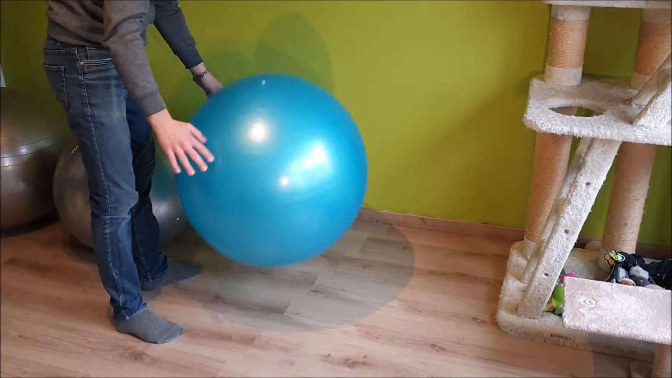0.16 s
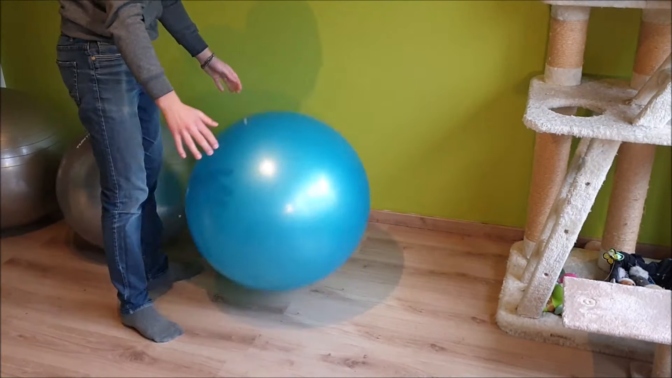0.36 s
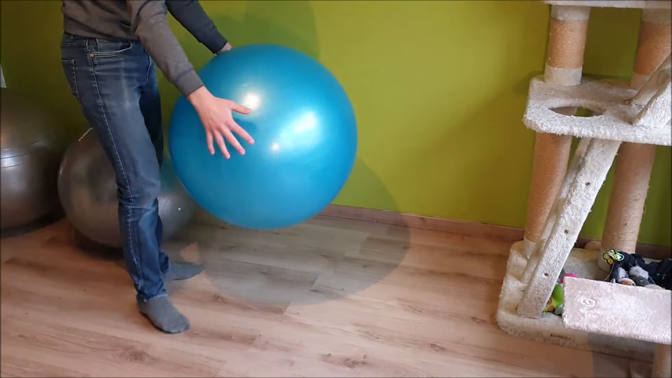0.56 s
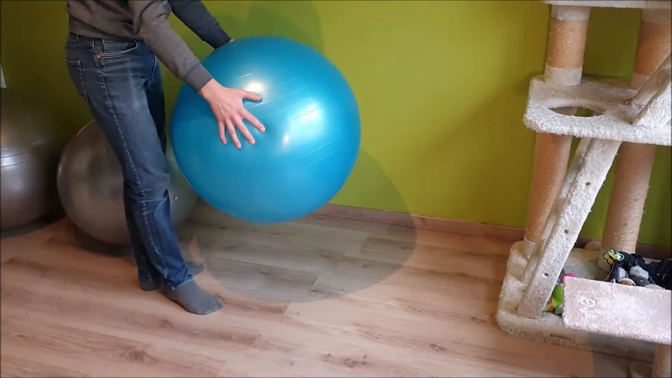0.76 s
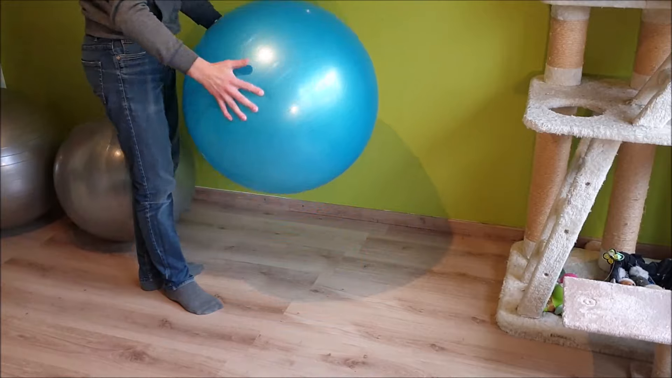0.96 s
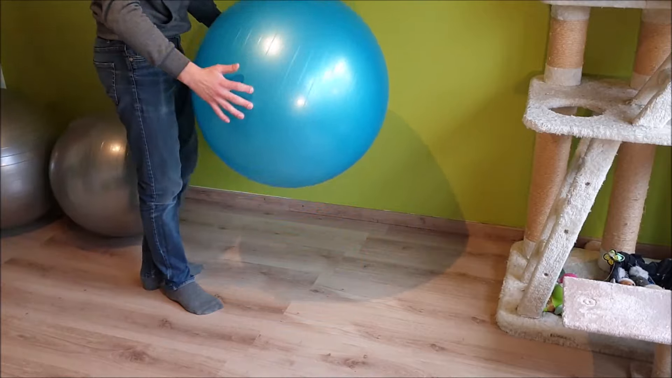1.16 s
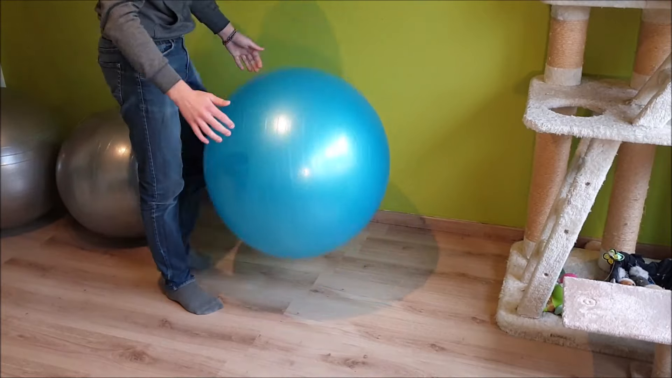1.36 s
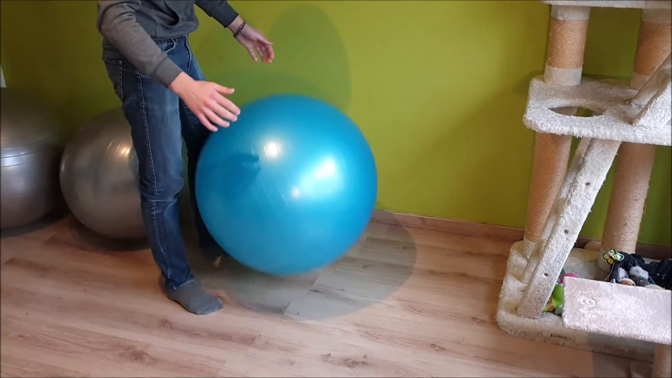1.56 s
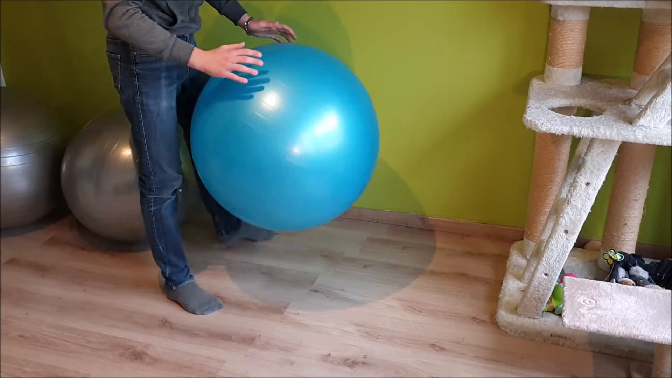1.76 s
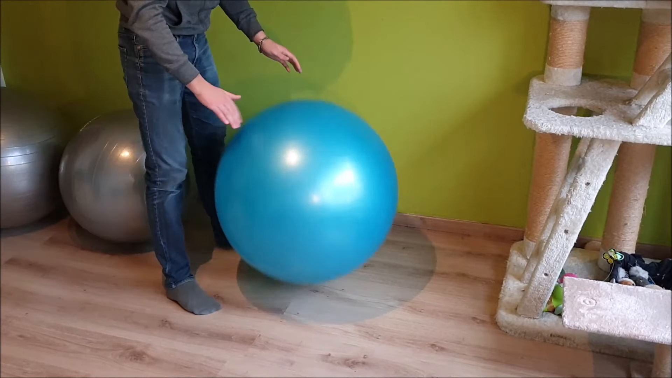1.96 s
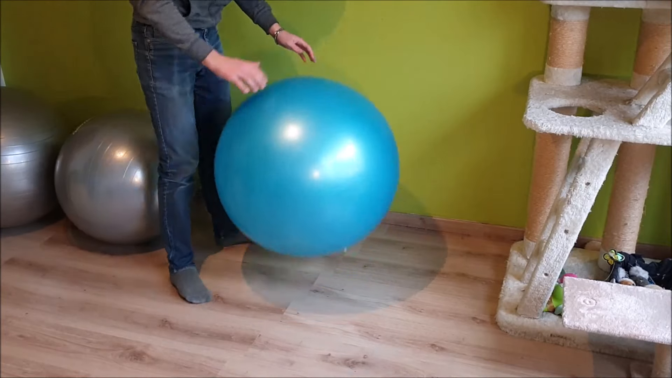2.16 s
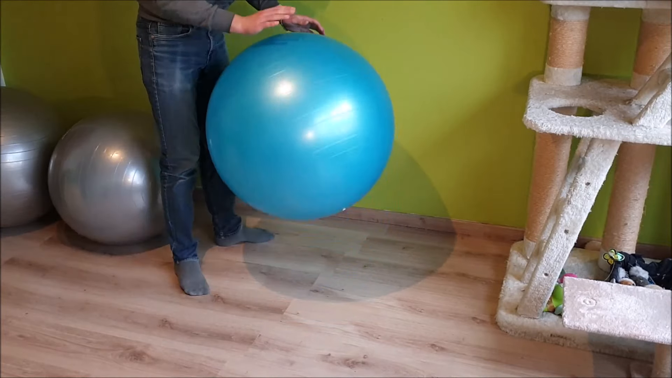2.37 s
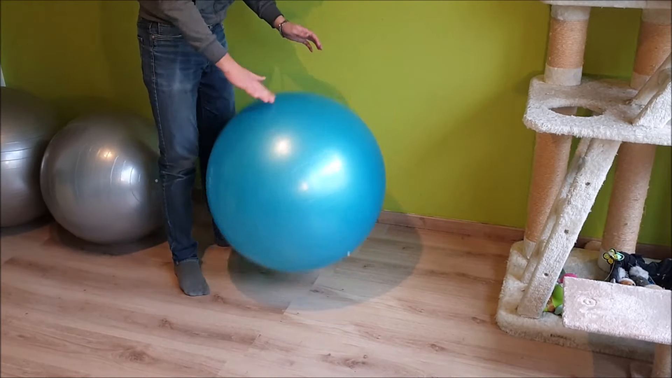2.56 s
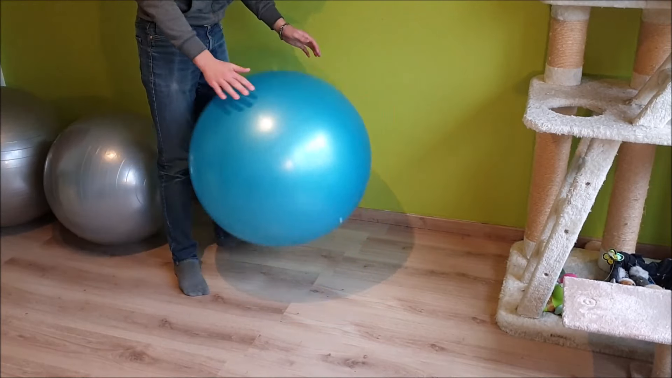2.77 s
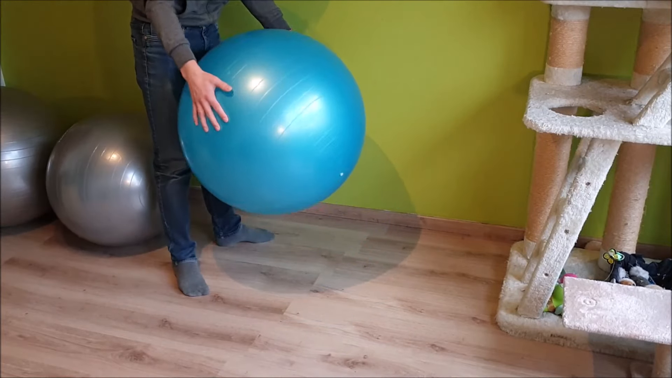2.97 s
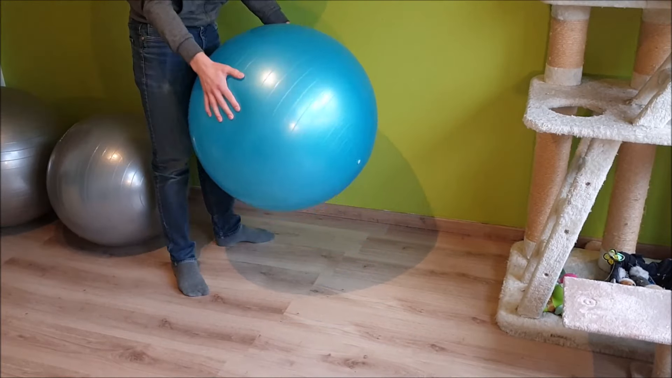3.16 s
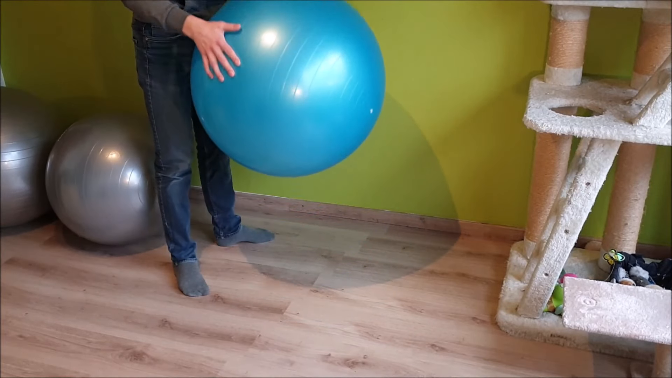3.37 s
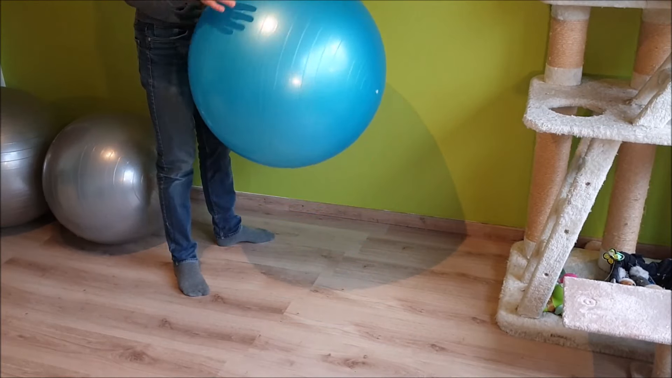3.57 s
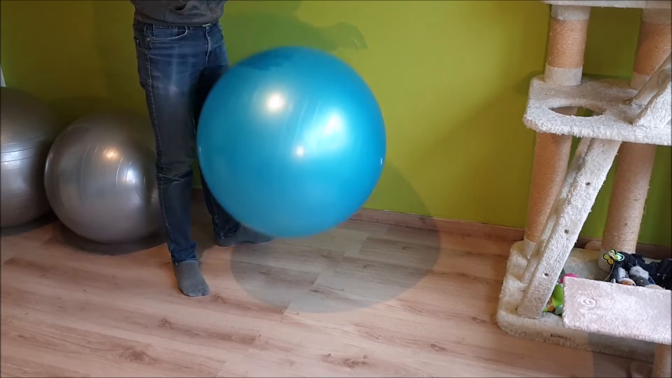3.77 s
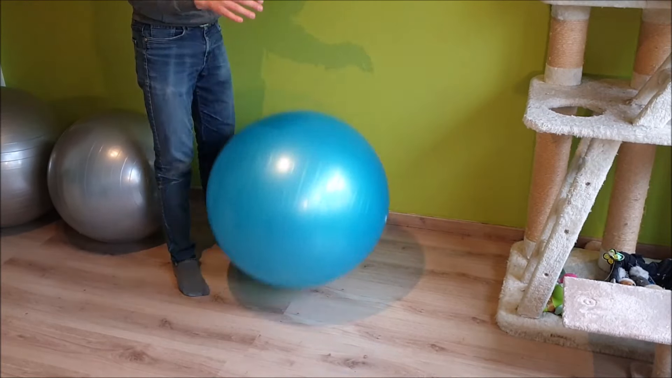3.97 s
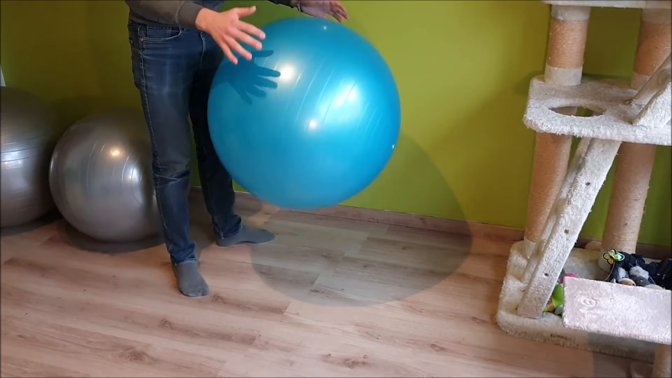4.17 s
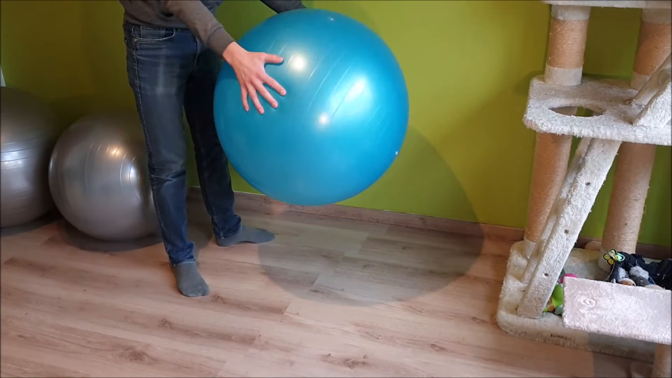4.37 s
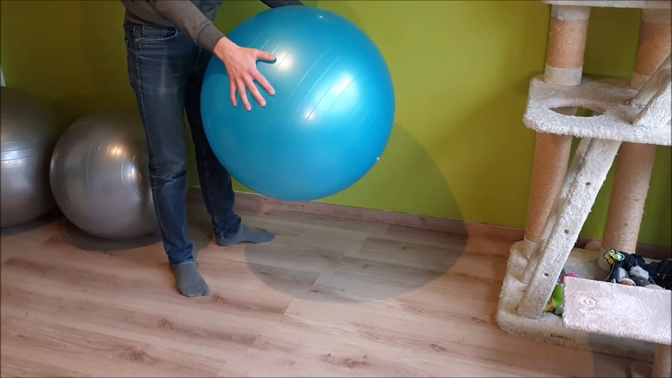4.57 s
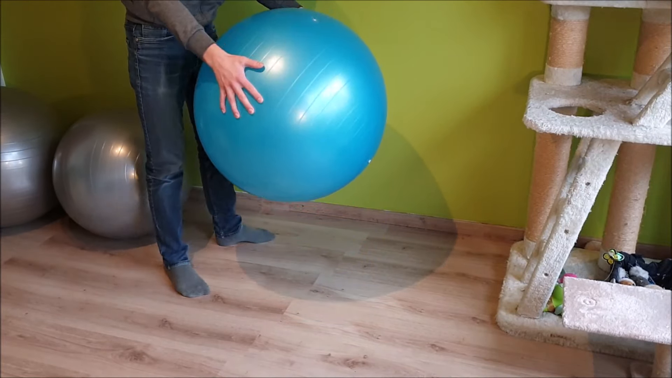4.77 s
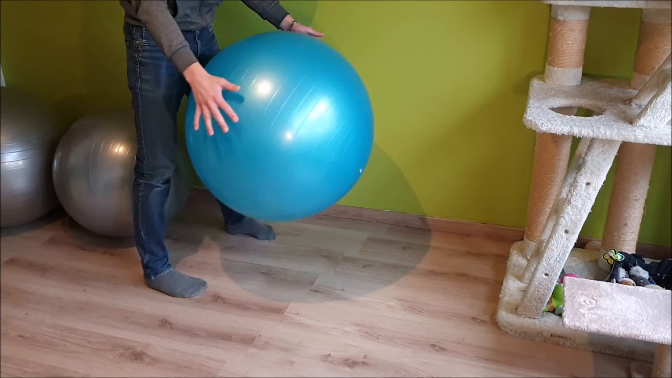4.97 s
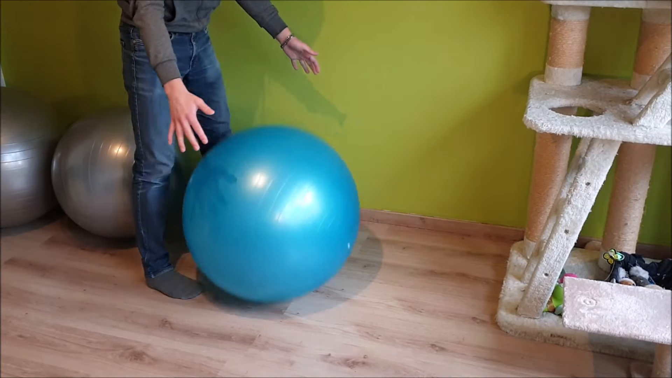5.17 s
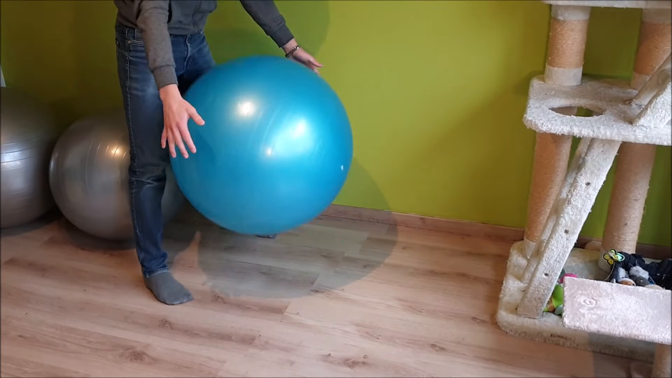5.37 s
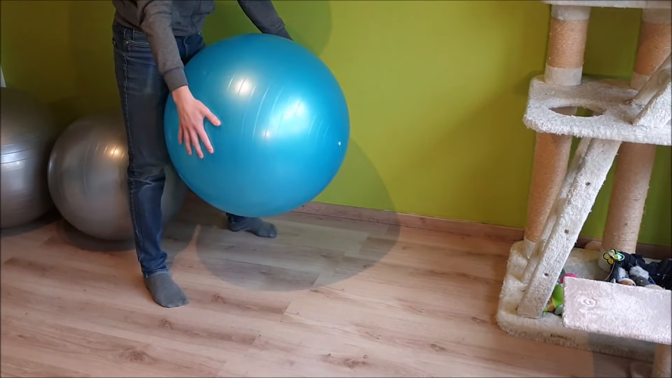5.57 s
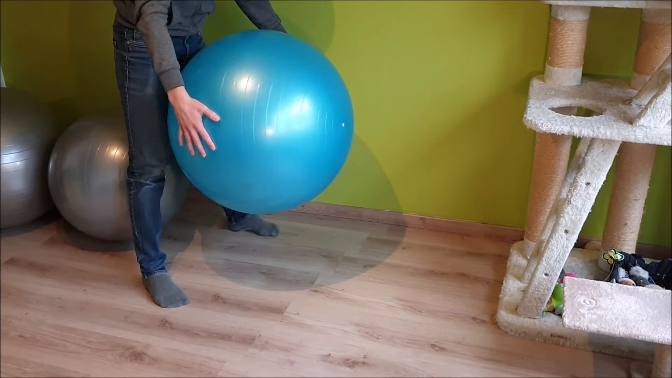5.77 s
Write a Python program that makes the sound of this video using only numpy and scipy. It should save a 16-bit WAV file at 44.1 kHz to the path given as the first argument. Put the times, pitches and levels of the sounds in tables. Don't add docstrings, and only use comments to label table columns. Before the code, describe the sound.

A person bounces and catches a large exercise ball indoors. Uneven floor thuds boom and ring briefly, the third loudest and the last faintest. Between them come muffled pats of hands on taut rubbery skin, low rumbles of weight shifting, and light cloth and finger rubbing. Close stereo pickup leans left, with short room reverberation and soft hiss.

```python
import sys
import numpy as np
from scipy import signal
from scipy.fft import rfft, irfft
from scipy.io import wavfile
from scipy.ndimage import uniform_filter1d

SR = 44100
rng = np.random.default_rng(int(sys.argv[2]) if len(sys.argv) > 2 else 0)


def volts_from_decibels(level):
    exponent = np.asarray(level, float) / 20
    return 10 ** exponent


def file_out(sig):
    cols = np.atleast_2d(sig).T
    lim = np.clip(cols, -1, 1)
    pcm = np.round(lim * 32767).astype(np.int16)
    wavfile.write(sys.argv[1], SR, pcm)


N = 257103
TAIL = SR // 2
ECHO = 2 ** 17
BANDS_HZ = 177 * 2 ** (np.arange(14) / 2)
PORTS_HZ = 673

# start [s], boom peak [dB], then deep, thud and skin slap against the boom [dB].
FLOOR_BOUNCES = [
    (0.3414, -28.5, -3, -4, -4),
    (1.5254, -29.5, 4.5, 2.5, -4),
    (2.0783, -25, 0, -5, -3.5),
    (2.6803, -27.5, 0, -0.5, -2.5),
    (3.9529, -27.5, -5, 1.5, -3.5),
    (5.227, -33, -4.5, 2.5, -2.2),
]
# start [s], boom peak [dB], contact time [s], thud and skin against the boom [dB].
PALM_CONTACTS = [(0.101, -47, 0.047, -1.5, -13.5), (0.645, -37, 0.039, -3, -14.5),
                 (0.673, -33.5, 0.12, -6.5, -16.5), (0.75, -27.5, 0.0047, -9, -17),
                 (1.142, -44, 0.032, -12, -19), (1.238, -49, 0.074, 1, -12.5),
                 (1.932, -29.5, 0.012, -3, -17.5), (2.524, -34.5, 0.023, -1.5, -11),
                 (2.59, -32, 0.013, -8, -17), (3.015, -38, 0.026, 2, -10.5),
                 (3.068, -42.5, 0.048, 6.5, -5.5), (3.138, -27.5, 0.0037, -22, -23.5),
                 (3.366, -47, 0.023, -9, -7.5), (3.404, -35, 0.034, -18.5, -19.5),
                 (3.499, -36, 0.015, -9, -22.5), (4.338, -34, 0.095, -3, -17), (4.363, -40, 0.032, 8.5, -3),
                 (4.416, -23, 0.023, -6, -18.5), (4.695, -41.5, 0.032, 0.5, -21.5),
                 (4.943, -59, 0.052, 7.5, 0.5), (5.543, -37.5, 0.037, -1.5, -16),
                 (5.568, -28.5, 0.04, -3, -17), (5.619, -33, 0.011, 1, -25)]
# full strength at [s], rise [s], hold [s], footing rumble [dB], skin creak [dB].
WEIGHT_SHIFTS = [(0.0, .02, 0.023, -47, -54.5), (0.108, 0.063, 0.0086, -41.5, -51.5),
                 (0.19, 0.067, 0.025, -55, -49), (0.5, 0.087, 0.0082, -54, -51.5),
                 (0.59, .04, .04, -54, -66), (0.74, 0.1, 0.09, -34.5, -42), (1.018, 0.15, .05, -49.5, -61),
                 (1.19, 0.27, 0.16, -53, -57), (3.72, 0.08, 0.094, -76, -68.5),
                 (1.7, 0.1, 0.0093, -40, -40), (1.806, .05, 0.0082, -45, -61),
                 (2.03, 0.12, 0.0078, -34, -45), (2.3, 0.07, 0.021, -44, -61.5),
                 (2.65, 0.18, .01, -47, -63), (2.85, 0.06, 0.025, -42.5, -48.5),
                 (2.99, .08, 0.22, -43.5, -47), (3.4, 0.085, 0.11, -42.5, -51.5),
                 (3.55, .05, .04, -65.5, -68), (4.12, 0.089, 0.036, -46, -47),
                 (4.41, 0.045, 0.095, -46, -44), (4.685, 0.034, 0.028, -43, -49.5),
                 (4.962, 0.094, 0.045, -43, -61), (5.4, 0.13, 0.013, -56, -47), (5.73, 0.2, 0.13, -75, -56)]
# full strength at [s], rise [s], hold [s], sleeve rustle [dB],
# finger hiss against the sleeve [dB].
RUBBINGS = [(0.0, .02, 0.0056, -65.5, -6), (0.103, 0.017, 0.019, -56, -6.5),
            (0.271, 0.033, .05, -62.5, -10), (0.563, 0.034, 0.024, -57, -10),
            (0.702, 0.15, 0.048, -60.5, -6.5), (0.9, 0.3, .01, -67, -6.5), (1.015, 0.073, 0.12, -71, -4.5),
            (1.225, 0.077, 0.037, -63.5, -5.5), (1.35, .05, 0.024, -73.5, -6),
            (1.703, 0.055, .02, -59.5, -11), (1.965, .05, 0.031, -72, 0.5),
            (2.3, 0.12, 0.079, -60.5, -13.5), (2.526, 0.01, .02, -51.5, -5), (2.966, 0.074, 0.16, -61, -2),
            (3.431, 0.037, 0.052, -70, -3), (3.586, .07, 0.0088, -68.5, -5),
            (3.78, 0.036, 0.0089, -58.5, -2), (4.125, .05, 0.039, -59.5, -14),
            (4.25, 0.12, 0.037, -66, -24), (4.37, 0.044, 0.049, -55.5, -7.5), (4.69, 0.038, 0.13, -76, -6),
            (4.951, 0.086, 0.094, -49.5, -7), (5.39, 0.059, .01, -63, -8), (5.572, 0.037, 0.067, -58.5, -4)]

# frequency [Hz], level [dB], t60 [s].
DEEP_MODES = [(45.08, 6.5, 0.57), (55.77, -1.5, 0.69), (61.17, 5, 0.32)]
# frequency [Hz], level [dB], t60 [s].
BOOM_MODES = [(70.4, -10.5, 0.7), (77.83, 2, 0.41), (85.7, -14.5, 0.55)]
# frequency [Hz], level [dB], t60 [s].
THUD_MODES = [(123.8, -3.5, 0.38), (140.04, 1, 0.52), (171.7, -4, 0.38), (206.5, 2, 0.37),
              (241.2, 0.5, 0.37), (284, -3.5, 0.32), (315.5, -8, 0.52)]
# frequency [Hz], level [dB], t60 [s].
BALL_AIR_MODES = [(375, -9.5, 0.36), (405, -3.5, 0.39), (431, -2, 0.29), (472.7, -3.5, 0.38),
                  (536, -9, 0.17), (601, -9, 0.41), (679, -11, 0.32), (732, -9, 0.22), (825, -12, 0.24),
                  (974, -8.5, 0.36), (1029.5, -11.5, 0.23), (1176, -14.5, 0.36), (1570, -22.5, 0.69),
                  (1862, -23, 0.38)]
# frequency [Hz], t60 [s].
ROOM_T60 = [(300, 0.4), (1000, 0.43), (3000, 0.44), (7000, 0.33), (14000, 0.25)]

# frequency [Hz], density [dB per Hz].
SLAP_SPECTRUM = [(310, 3), (520, 1.5), (609, -3), (673, 0.5), (1210, -3), (1760, -6.5), (2910, -3.5),
                 (3450, -5.5), (6390, -4), (8390, -12.5), (10900, -9.5), (13900, -13), (16000, -18)]
# frequency [Hz], density [dB per Hz].
PAT_SPECTRUM = [(250, -24), (500, 12), (1000, 4), (1800, 0.5), (3500, -11.5), (7000, -18.5), (8600, -26),
                (12000, -19), (16000, -16)]
# frequency [Hz], density [dB per Hz].
CREAK_SPECTRUM = [(65, -36), (110, 0), (203, 2), (371, -13.5), (412, -1.5), (514, -33), (845, -23.5),
                  (1160, -30.5), (1340, -33), (2500, -51), (3250, -59), (5500, -120)]
# frequency [Hz], density [dB per Hz].
SLEEVE_SPECTRUM = [(500, -2.5), (1200, -6), (2400, -8.5), (3500, -2.5), (5500, -4), (7200, -2.5),
                   (8500, -17), (10000, -43)]
# frequency [Hz], density [dB per Hz].
FINGER_SPECTRUM = [(7500, -25), (9000, -6.5), (10500, 0.5), (13000, -3), (15500, -1), (16200, -29)]
# frequency [Hz], density [dB per Hz].
HISS_SPECTRUM = [(30, 6), (130, 1), (300, -10.5), (900, -17.5), (2000, -8.5), (3300, -24.5), (7000, -19),
                 (8400, -32), (12000, -23), (16000, -26.5)]
# frequency [Hz], left minus right [dB].
LEFT_MINUS_RIGHT = [(60, 2.5), (250, 2.5), (1000, 5), (4000, 6), (12000, 8.5)]
# frequency [Hz], gain [dB].
TOP_CUT = [(15700, -2.5), (16100, -35)]


def on_log(table, hz):
    f, v = np.transpose(table)
    return np.interp(np.log(hz + 1), np.log(f), v)


def colour(x, table):
    size = x.shape[-1]
    gain = volts_from_decibels(on_log(table, np.fft.rfftfreq(size, 1 / SR)))
    y = irfft(rfft(x) * gain, size)
    return y / np.sqrt(np.mean(y ** 2))


def field(size):
    mid, side = rfft(rng.standard_normal((2, size)))
    alike = 1 / (1 + (np.fft.rfftfreq(size, 1 / SR) / PORTS_HZ) ** 2)
    difference = np.sqrt(1 - alike) * side * np.array([[1], [-1]])
    return irfft(np.sqrt(1 + alike) * mid + difference, size)


def walk(rate_hz, size=N):
    k = int(SR / rate_hz)
    steps = np.repeat(rng.standard_normal(size // k + 1), k)
    return 1.69 * uniform_filter1d(uniform_filter1d(steps, k), k)[:size]


def room_hiss():
    return volts_from_decibels(-67) * colour(field(N), HISS_SPECTRUM)


def gestures(table, fall_db_s):
    s, rise, hold, *levels_db = np.transpose(table)[:, :, None]
    t = np.arange(0, N, 64) / SR
    climb_db = 17.5 * np.maximum(s - t, 0) / np.maximum(rise, .005)
    fall_db = fall_db_s * np.maximum(t - s - np.abs(hold), 0)
    gains = []
    for db in levels_db:
        energy = (volts_from_decibels(db - climb_db - fall_db) ** 2).sum(0)
        gains.append(np.interp(np.arange(N) / SR, t, np.sqrt(energy)))
    return gains


def humps(table, spread, dip_db):
    around = (1 - spread, dip_db), (1, 0), (1 + spread, dip_db)
    return [(hz * k, db + dip) for hz, db, _ in table for k, dip in around]


def weight_shifts():
    feet, creak = gestures(WEIGHT_SHIFTS, fall_db_s=146)
    hum = [(21, -37)] + humps(DEEP_MODES + BOOM_MODES, spread=0.035, dip_db=-7.5) + [(110, -33), (300, -100)]
    level_modes = [(hz, 0, t60) for hz, _, t60 in THUD_MODES + BALL_AIR_MODES]
    air = humps(level_modes, spread=0.015, dip_db=-2)
    rumble = feet * colour(field(N), hum)
    stick_slip = volts_from_decibels(1.7 * walk(35))
    return rumble + creak * stick_slip * colour(colour(field(N), CREAK_SPECTRUM), air)


def rubbings():
    drag_s, drag_hz = 0.031, 3100
    rows = [(*row, db, db + rel) for *row, db, rel in RUBBINGS]
    sleeve, finger = gestures(rows, fall_db_s=170)
    shared = walk(8.9)
    cloth = volts_from_decibels(1.2 * shared + 0.73 * walk(60)) * colour(field(N), SLEEVE_SPECTRUM)
    dull = signal.sosfiltfilt(signal.butter(4, drag_hz, fs=SR, output="sos"), cloth)
    late = np.interp(np.arange(N) - drag_s * SR, np.arange(N), sleeve)
    rustle = sleeve * (cloth - dull) + late * dull
    return rustle + finger * volts_from_decibels(0.82 * shared + 1.3 * walk(68)) * colour(field(N), FINGER_SPECTRUM)


def modes(table):
    hz = np.transpose(table)[0][:, None, None]
    slip = 1.8 * np.minimum(hz / PORTS_HZ, 2) * rng.standard_normal(hz.shape) * np.array([[.5], [-.5]])
    waver = []
    for f in hz.ravel():
        flicker = 0.98j * walk(33.95, size=2 * TAIL) + 0.35 * walk(35.98, size=2 * TAIL)
        waver.append([min(f / 300, 1.5) * flicker])
    return np.exp(1j * (2 * np.pi * hz * np.arange(2 * TAIL) / SR + slip) + np.array(waver))


def walls(spectrum):
    hz = np.fft.rfftfreq(ECHO, 1 / SR)
    echo = rfft(field(ECHO)) * volts_from_decibels(on_log(spectrum, hz))
    bands = []
    for centre in BANDS_HZ:
        window = np.clip(1 - 2 * np.abs(np.log2((hz + 1) / centre)), 0, 1)
        bands.append(irfft(echo * window))
    return np.array(bands)


def swell(t60, rise_s, hold_s):
    t = np.arange(TAIL) / SR
    free = np.sqrt(t ** 2 + hold_s ** 2) - hold_s
    ends = (1 - np.exp(-t / max(rise_s, 1e-4))) * np.minimum(1, (t[-1] - t) * 10)
    return ends * np.exp(-np.log(1000) * free / np.reshape(t60, (-1, 1)))


def contacts(s, levels_db, contact_s, tones, echoes, above_hz, rises, hold, scatter_db, tilt_db):
    out, objects = np.zeros((2, N + TAIL)), (DEEP_MODES, BOOM_MODES, THUD_MODES, BALL_AIR_MODES)
    luck = rng.random((len(s), 2, sum(map(len, objects)) + 1))
    treble = np.sqrt(echoes[BANDS_HZ > above_hz].sum(0).var() / echoes.sum(0).var())
    for at, db, contact, (turn, size) in zip((s * SR).astype(int), levels_db, contact_s, luck):
        layers, first, skip = [], 0, int(size[-1] * TAIL)
        for body, tone, rise in zip(objects, tones, rises):
            hz, mode_db, t60 = np.transpose(body)
            own = slice(first, first + len(body))
            gain = volts_from_decibels(mode_db + tilt_db * np.log2(hz) + scatter_db * (2 * size[own] - 1))
            gain = gain * np.exp(2j * np.pi * turn[own] * np.minimum(hz / 250, 1))
            gain = gain * np.exp(-1j * np.angle(tone[:, 0, skip]))
            shape = gain[:, None] * swell(t60, rise * contact, hold * contact)
            layers.append(np.einsum("mt,mct->ct", shape, tone[:, :, skip:skip + TAIL]).imag)
            first += len(body)
        start = int(turn[-1] * (ECHO - TAIL))
        shape = swell(on_log(ROOM_T60, BANDS_HZ), rises[-1] * contact, hold * contact)
        layers.append(np.einsum("mt,mct->ct", shape, echoes[:, :, start:start + TAIL]))
        for sound, gain in zip(layers, volts_from_decibels(db) / [1, 1, 1, 1, treble]):
            peak = np.sqrt(uniform_filter1d(sound.mean(0) ** 2, size=600).max())
            out[:, at:at + TAIL] += sound * gain / peak
    return out[:, :N]


def palms(tones):
    s, db, contact, thud, skin = np.transpose(PALM_CONTACTS)
    pat = skin - 10.5
    levels_db = (db + np.array([0 * db - 10, 0 * db, thud, skin, pat])).T
    return contacts(s, levels_db, contact, tones, walls(PAT_SPECTRUM), above_hz=1400,
                    rises=(0.24, 0.3, 0.23, 0.36, 0.51), hold=0.62, scatter_db=4.5, tilt_db=-2.0)


def bounces(tones):
    s, db, deep, thud, slap = np.transpose(FLOOR_BOUNCES)
    ring = slap - 2.5
    levels_db = (db + np.array([deep, 0 * db, thud, ring, slap])).T
    contact_s = 0.03 + 0 * s
    return contacts(s, levels_db, contact_s, tones, walls(SLAP_SPECTRUM), above_hz=1500,
                    rises=(0.85, 0.7, 0.33, 0.18, 0.08), hold=1.0, scatter_db=4.0, tilt_db=3.4)


def knocks():
    knock_db, knock_s = 7, 0.00038
    crack_db, crack_s = 3, 0.0004
    wall_s, wall_db = 0.0095, 1
    s, db, *_, slap = np.transpose(FLOOR_BOUNCES)
    t, out = np.arange(-200, 200) / SR, np.zeros((2, N))
    dip = -(1 - (t / knock_s) ** 2) * np.exp(-(t / knock_s) ** 2 / 2)
    burst = volts_from_decibels(crack_db) * np.exp(-((t - knock_s) / crack_s) ** 2 / 2)
    grits = rng.standard_normal((len(s), 2, len(t)))
    for at, gain, grit in zip(s + knock_s * 2, volts_from_decibels(db + slap + knock_db), grits):
        knock = dip + burst * uniform_filter1d(grit.mean(0) + grit / 2, size=3)
        for late, loss in ((0, 1), (wall_s, volts_from_decibels(wall_db))):
            first = int((at + late) * SR) - len(t) // 2
            out[:, first:first + len(t)] += gain * loss * knock
    return out


def scene():
    tones = modes(DEEP_MODES), modes(BOOM_MODES), modes(THUD_MODES), modes(BALL_AIR_MODES)
    handling = weight_shifts() + rubbings()
    return room_hiss() + handling + palms(tones) + bounces(tones) + knocks()


def top_cut(x):
    return signal.sosfilt(signal.butter(12, 16840, fs=SR, output="sos"), x)


def record(dry):
    lead_s = 0.00013
    dry = signal.sosfilt(signal.butter(4, 38, "high", fs=SR, output="sos"), dry)
    hz, side = np.fft.rfftfreq(N, 1 / SR), np.array([[.5], [-.5]])
    ports = volts_from_decibels(on_log(LEFT_MINUS_RIGHT, hz) * side + on_log(TOP_CUT, hz))
    ports = ports * np.exp(2j * np.pi * hz * lead_s * side)
    return top_cut(irfft(rfft(dry) * ports, N))


dry = scene()
out = record(dry)
file_out(out)
```